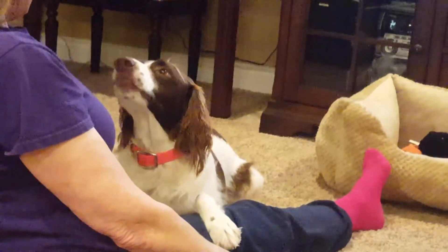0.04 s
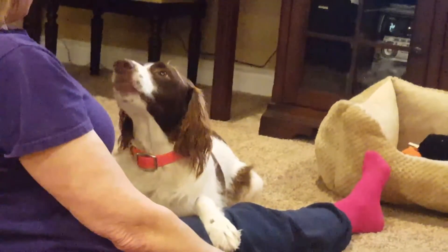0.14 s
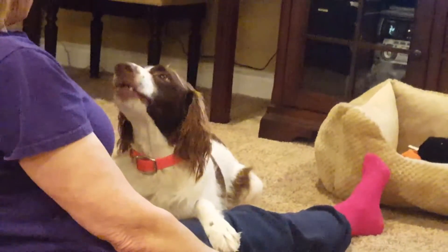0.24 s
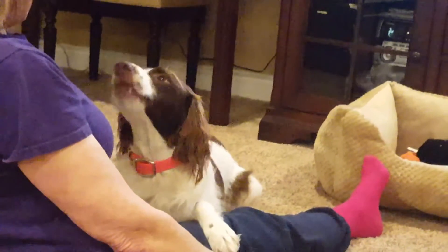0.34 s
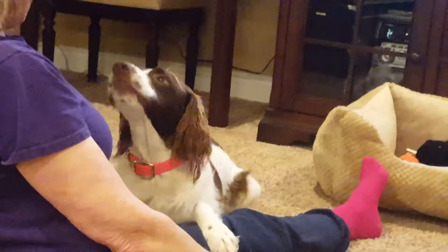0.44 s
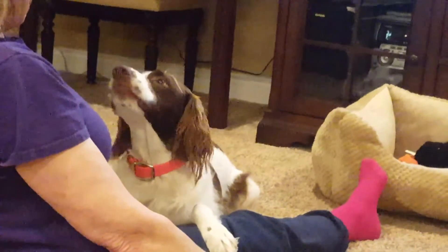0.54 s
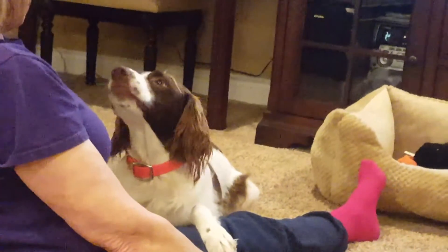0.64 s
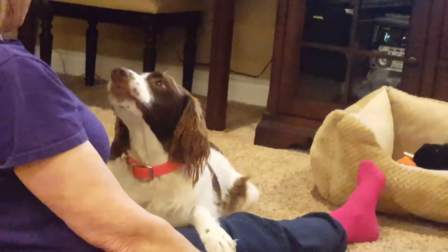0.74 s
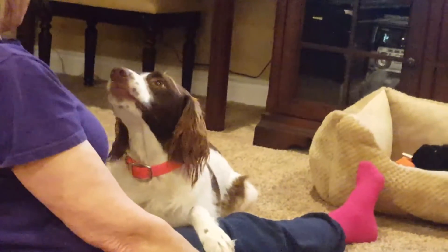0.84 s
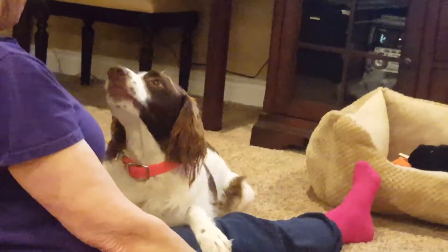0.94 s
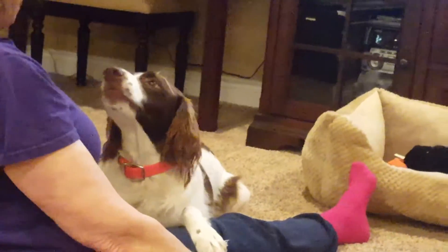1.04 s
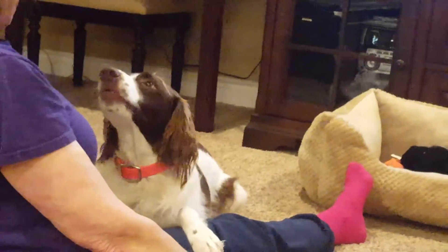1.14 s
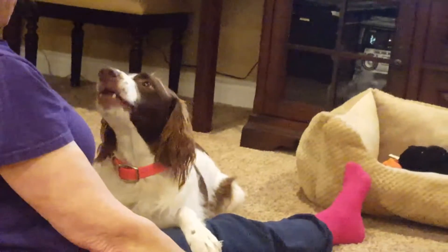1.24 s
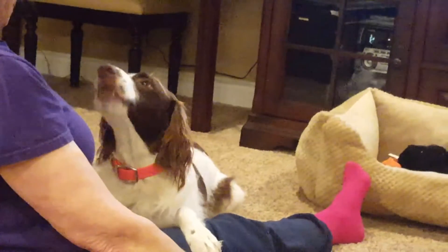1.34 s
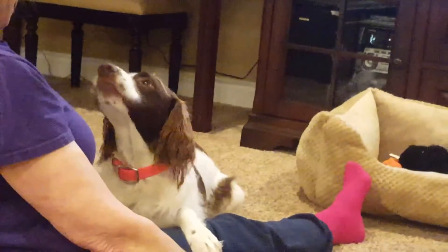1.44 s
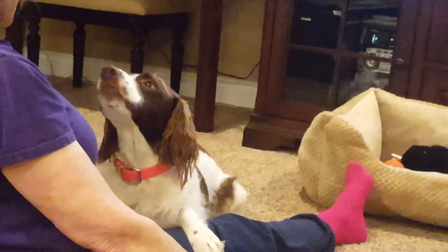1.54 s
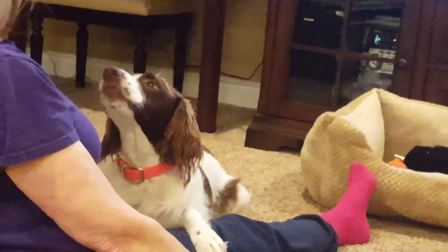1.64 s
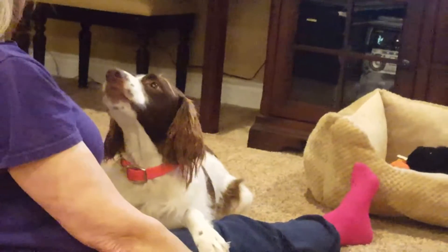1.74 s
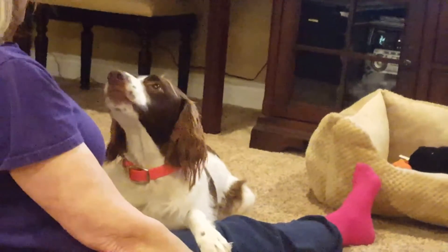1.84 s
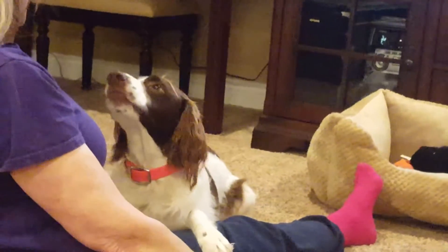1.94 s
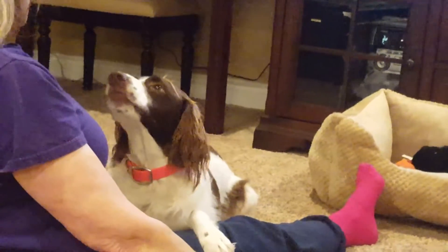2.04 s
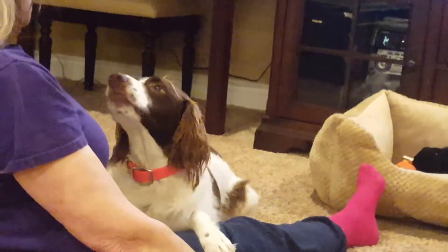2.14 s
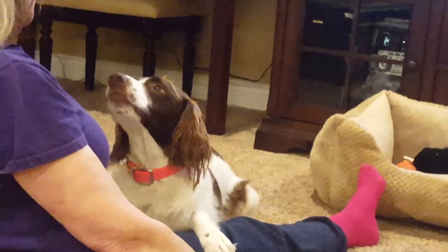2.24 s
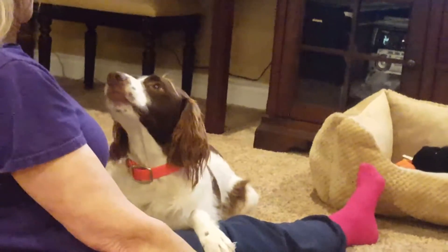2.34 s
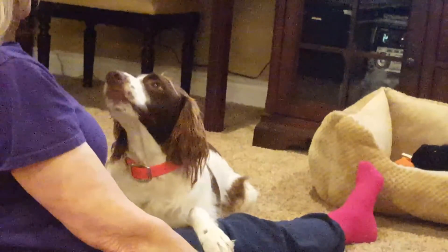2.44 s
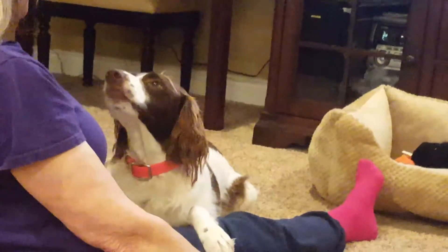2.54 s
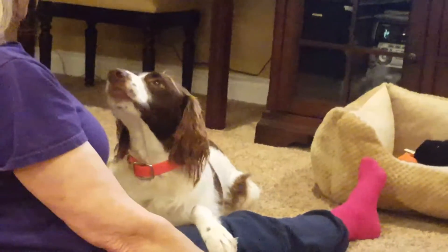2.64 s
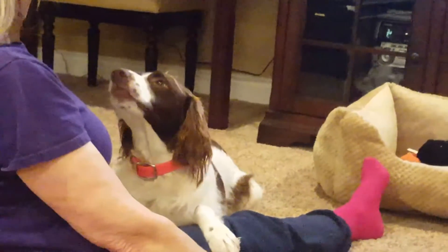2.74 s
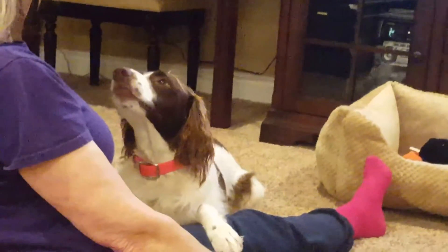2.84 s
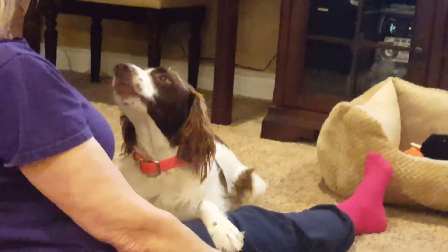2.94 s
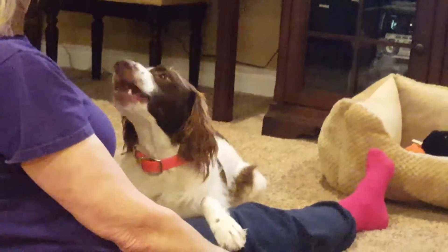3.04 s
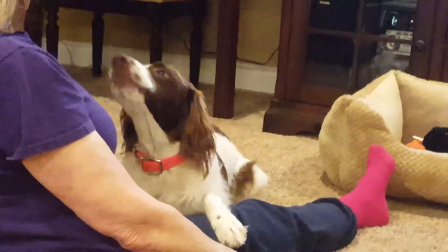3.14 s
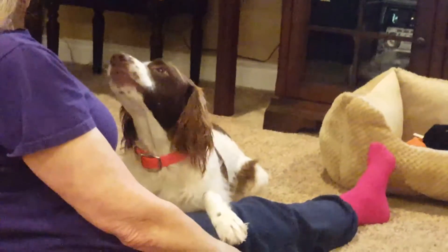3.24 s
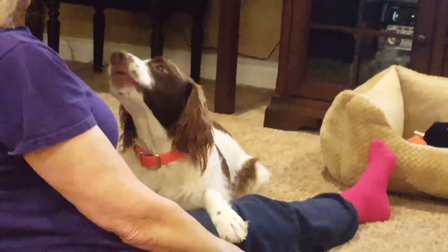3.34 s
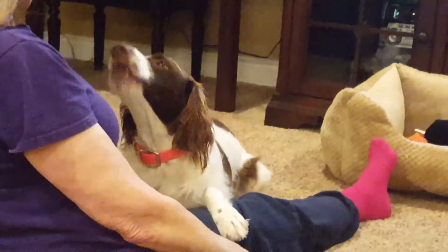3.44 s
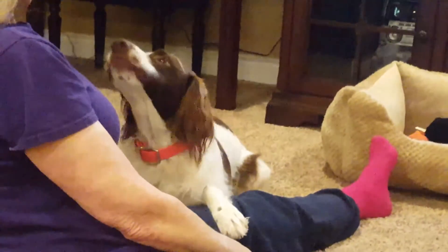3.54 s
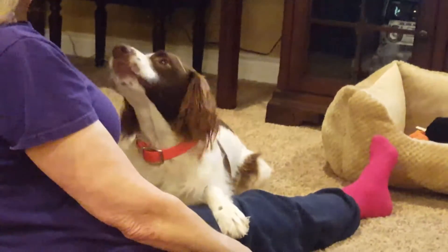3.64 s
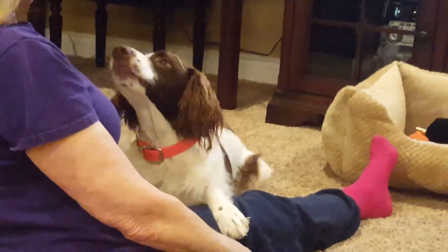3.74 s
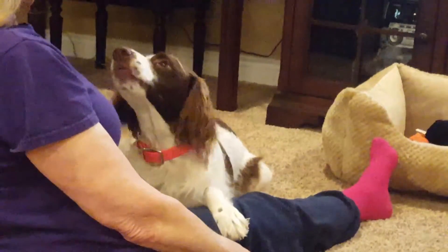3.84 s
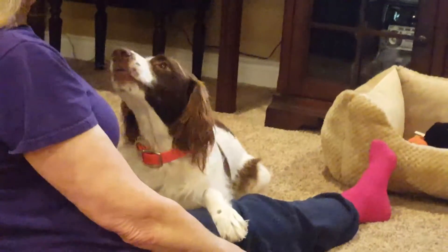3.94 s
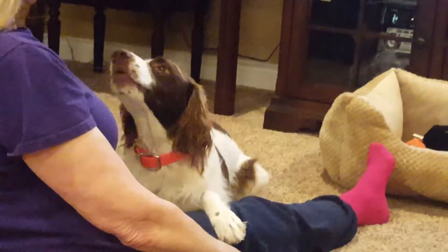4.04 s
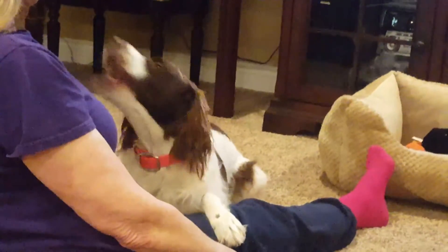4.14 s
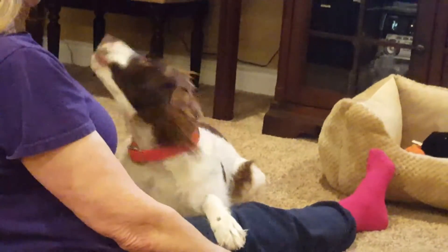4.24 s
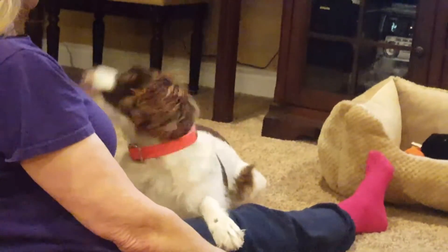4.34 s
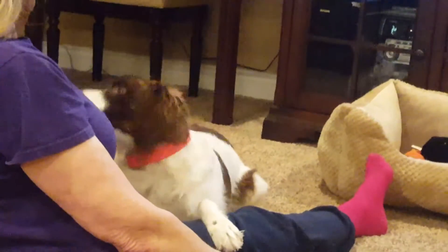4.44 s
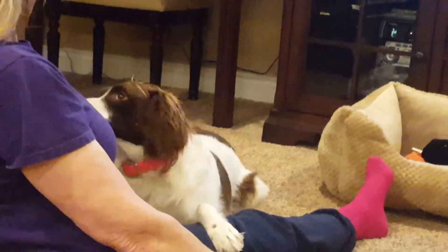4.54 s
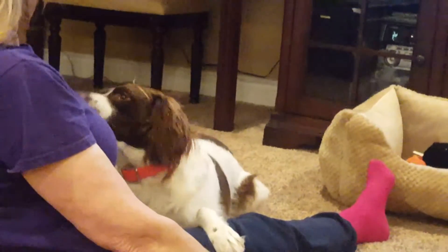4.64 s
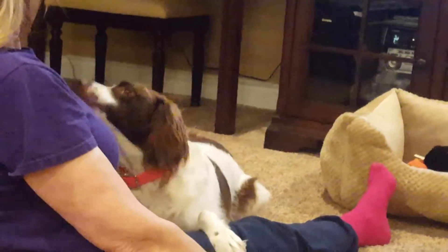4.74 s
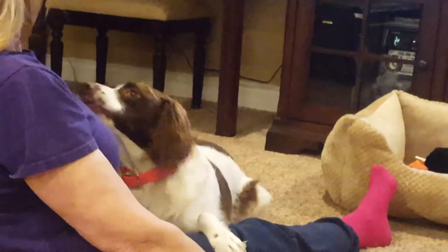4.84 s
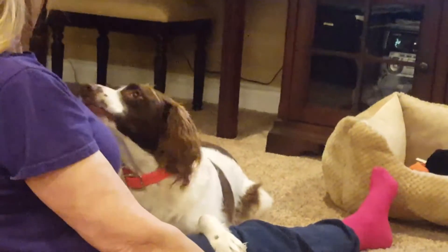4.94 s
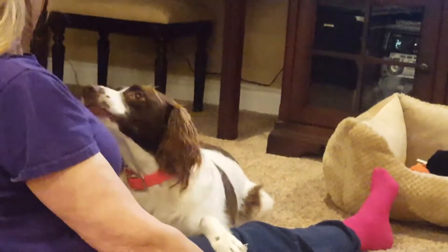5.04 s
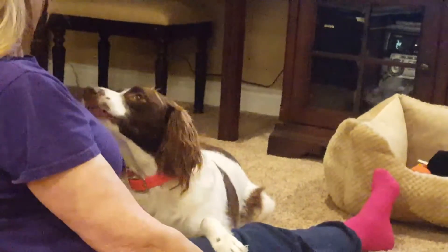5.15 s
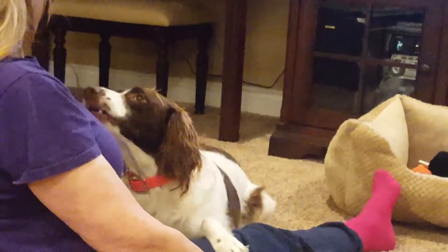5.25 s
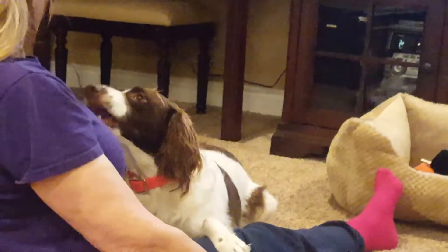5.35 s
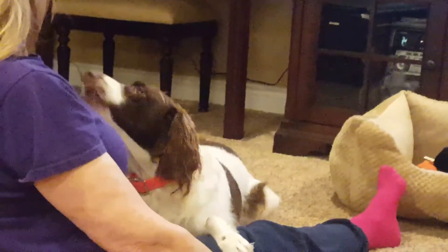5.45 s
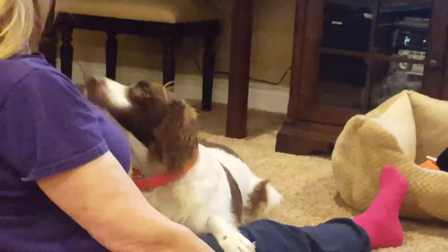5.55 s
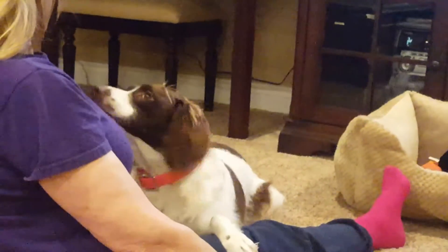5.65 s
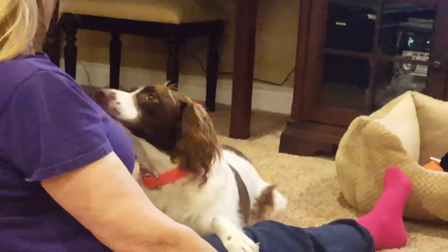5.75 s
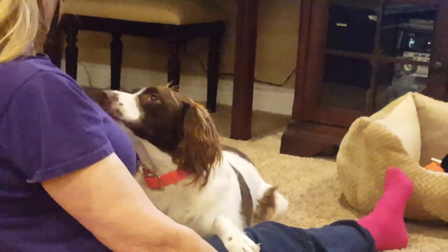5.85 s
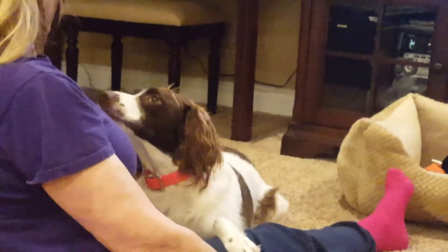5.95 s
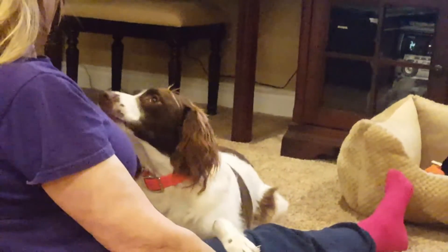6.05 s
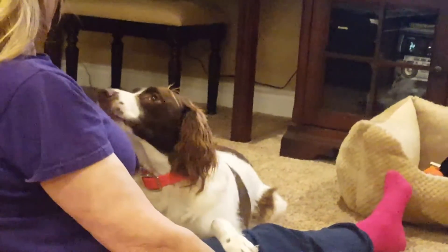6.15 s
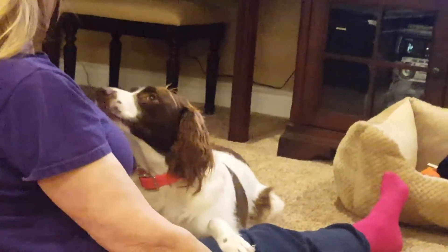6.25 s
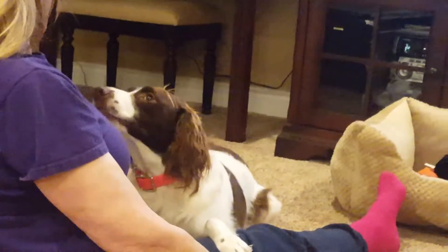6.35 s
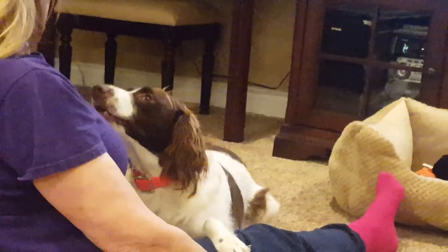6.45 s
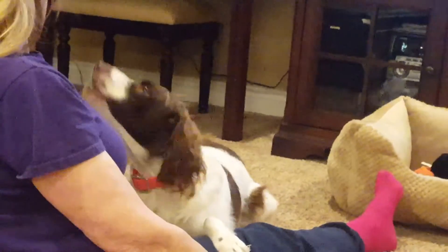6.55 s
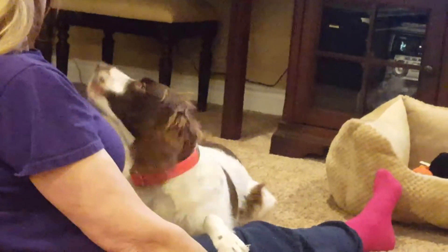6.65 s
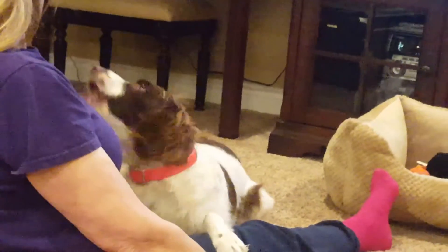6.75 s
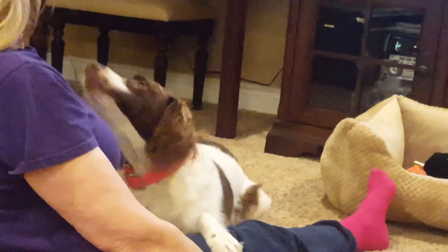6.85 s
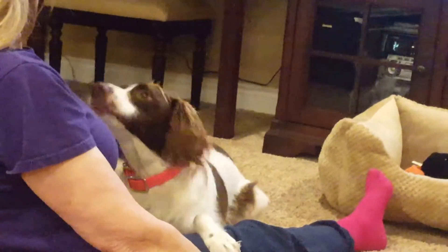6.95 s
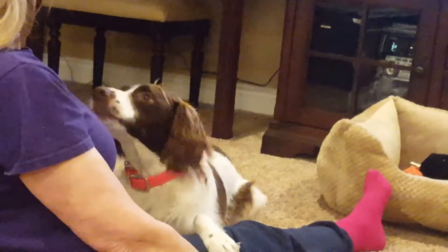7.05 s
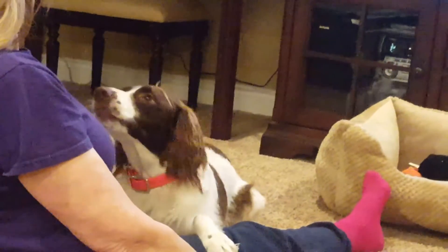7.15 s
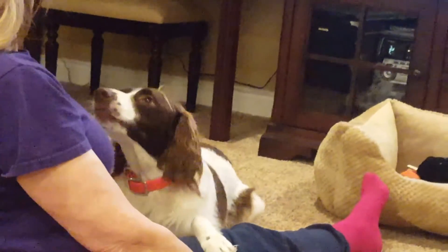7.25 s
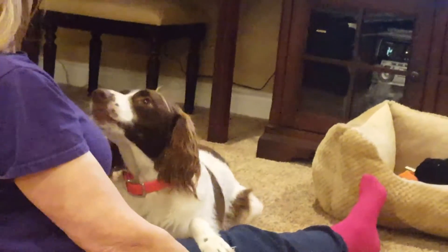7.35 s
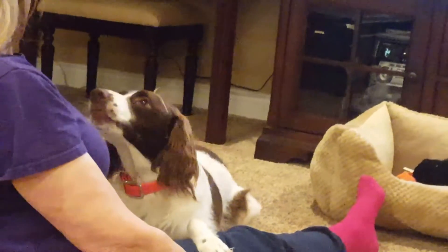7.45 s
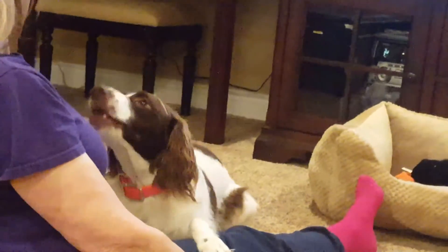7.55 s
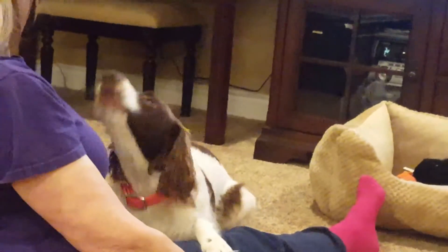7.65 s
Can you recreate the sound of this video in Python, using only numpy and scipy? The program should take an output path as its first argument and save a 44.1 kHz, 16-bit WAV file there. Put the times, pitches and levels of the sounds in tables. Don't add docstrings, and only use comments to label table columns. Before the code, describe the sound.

Close indoor phone pickup of one dog barking in a carpeted, furnished room. It starts with subdued, breathy huffs, spaced apart, with mouth clicks and faint nose or coat rubbing between. Then come short, piercing yelps that leap up in pitch and fall quickly into a small growl, irregularly spaced and closer together near the end. The room answers with a short diffuse ring; underneath is steady soft air and low appliance rumble.

```python
import sys
import numpy as np
from scipy import signal
from scipy.fft import rfft, irfft
from scipy.io import wavfile
from scipy.ndimage import uniform_filter1d, minimum_filter1d

SR = 44100
rng = np.random.default_rng(int(sys.argv[2]) if len(sys.argv) > 2 else 0)


def linear_from_db(decibels):
    return 10 ** (np.asarray(decibels, float) / 20)


def dump(signal):
    limited = np.clip(np.atleast_2d(signal).T, -1, 1)
    pcm = np.round(limited * 32767).astype(np.int16)
    wavfile.write(sys.argv[1], SR, pcm)


N = 339570

# (start [s], climb [s], hold [s], top pitch [Hz], level [dB])
BARK_CALLS = [
    (0.34, 0.034, 0.028, 204.8, -26.5),
    (1.327, 0.051, 0.018, 188, -22.5),
    (3.092, .06, .03, 298.5, -24),
    (3.419, 0.059, .036, 489.7, -10.5),
    (4.173, 0.049, .056, 559, -11),
    (4.696, .05, 0.019, 269.4, -38.5),
    (5.411, .049, .06, 599.8, -7.5),
    (6.508, 0.072, 0.039, 512, -14.5),
    (6.729, .055, .064, 606, -9.5),
    (7.607, 0.053, .03, 523.6, -11.5),
]
# (pitch as the hold ends [Hz], growl level [dB], last pitch [Hz])
BARK_GROWLS = [(234.5, -37, 105), (188, -39.5, 112), (318, -34.5, 91), (514.3, -30, 150), (481.2, -32, 98),
               (297.2, -40, 77), (571.7, -43.5, 170), (451.3, -29, 88), (478.5, -35.5, 120),
               (443.3, -17, 230)]
GROWL_LENGTHS = [.06, .09, .19, .09, .22, .08, .05, .1, .06, .05]
TOP_ROUGHNESS = [.3, .3, .2, .03, .06, .12, .14, .12, .26, .08]
# (whistling burst at the start [dB], narrow ring [dB], tongue resonance [Hz],
# first breath [dB], widest opening [about 0-1])
BARK_MOUTHS = [(-41.5, 13, 1360, -39, .75), (-43, 8, 1300, -39.5, 0.81), (-50, 10, 1430, -41, .75),
               (-61, 13.5, 1125, -53, 0.8), (-52, 4, 1277, -43, 0.9), (-60, -5, 1300, -45, 0.6),
               (-49, 5.5, 1272, -40, 1.1), (-48.5, 5, 1300, -40.5, 0.81), (-61.5, 4.5, 1080, -37, 1.0),
               (-52.5, 6.5, 1250, -47.5, 0.9)]


def dog_barks():
    barks = 0
    for call, growl, growl_s, top_rough, mouth in zip(
            BARK_CALLS, BARK_GROWLS, GROWL_LENGTHS, TOP_ROUGHNESS, BARK_MOUTHS):
        burst_db, ring_db, tongue_hz, onset_db, widest = mouth
        rows = gesture(call, growl, growl_s, top_rough, onset_db, widest)
        barks = barks + bark(rows, burst_db, ring_db, tongue_hz)
    no_rumble = signal.butter(2, 70, "high", fs=SR, output="sos")
    return signal.sosfilt(no_rumble, barks)


def gesture(call, growl, growl_s, top_rough, onset_db, widest):
    start, climb, hold, top_hz, top_db = call
    held_hz, growl_db, last_hz = growl
    onset_hz, onset_rough = 145.73, .65
    growl_rough, last_rough = .3, .9
    top_open, held_open = widest * .8, widest * .66
    growl_open = .14
    top = start + climb
    let_go = top + hold
    broken = let_go + .014
    broken_hz = min(217, 0.74 * held_hz)
    sunk_hz = broken_hz * (last_hz / broken_hz) ** .8
    halfway_hz = onset_hz + .38 * (top_hz - onset_hz)
    halfway_db = onset_db + .65 * (top_db - onset_db)
    sagging_hz = top_hz + .27 * (held_hz - top_hz)
    return [(start, onset_hz, onset_db, onset_rough, widest * .52),
            (start + .58 * climb, halfway_hz, halfway_db, onset_rough, widest),
            (top, top_hz, top_db, top_rough, top_open),
            (top + hold / 2, sagging_hz, top_db, top_rough, (top_open + held_open) / 2),
            (let_go, held_hz, top_db - 4, top_rough, held_open),
            (broken, broken_hz, growl_db, growl_rough, growl_open),
            (broken + .04, sunk_hz, growl_db - 5, growl_rough, growl_open),
            (broken + growl_s, last_hz, growl_db - 22, last_rough, growl_open)]


# (pitch [Hz], width [Hz], level [dB])
THROAT_RESONANCES = [(575, 265, 0), (1780, 786, -6.5), (2695, 247, -6), (3049, 300, -16.5)]
# (pitch [Hz], width [Hz], level [dB])
TEETH_RESONANCES = [(3300, 450, -7), (5250, 700, -0.5), (6700, 570, 0), (9000, 500, -28.5),
                    (12200, 3500, -23)]


def bark(rows, burst_db, ring_db, tongue_hz):
    s, *columns = np.transpose(rows)
    start = int(s[0] * SR)
    pad = 600
    t = np.arange(start - pad, int(s[-1] * SR) + pad) / SR
    since = np.maximum(t - s[0], 0)
    pitch_hz, level_db, rough, opening = [np.interp(t, s, c) for c in columns]
    rough = np.clip(rough, 0, 1)

    cycles = np.cumsum(pitch_hz * (1 + .18 * rough * wobble(len(t), 110))) / SR
    cycles -= cycles[pad + 30]
    harmonic = np.arange(1, 40)[:, None]
    harmonic_hz = harmonic * pitch_hz
    slope_db = -15.0 + 13.57 * opening
    weights = linear_from_db(slope_db * np.log2(harmonic_hz / 550)) * (harmonic_hz < 5000)
    pulses = np.sum(weights * np.sin(2 * np.pi * harmonic * cycles), axis=0)
    pulses *= linear_from_db(4.5 * rough * wobble(len(t), 190))
    pulses *= 1 + 0.45 * rough * np.cos(np.pi * cycles)

    gate = 1.2 + np.cos(np.pi * cycles) ** 4
    no_lows = signal.butter(2, 400, "high", fs=SR, output="sos")
    air = gate * signal.sosfilt(no_lows, rng.standard_normal(len(t)))
    breathy = .12 + 2.2 * rough
    source = pulses + breathy * opening * np.sqrt(np.sum(weights ** 2, axis=0)) * air

    tight = np.exp(-(since / .022) ** 2)
    ring = tight * resonance(source, 700, 55) + (1 - tight) * resonance(source, 570, 55)
    low_voice = np.clip((420 - pitch_hz) / 100, 0, 1)
    tongue = (tongue_hz, 260, -1.5)
    voice = tract(source, [THROAT_RESONANCES[0], tongue, *THROAT_RESONANCES[1:]])
    voice += linear_from_db(ring_db + 3.5) * low_voice * opening ** 2 * ring
    closed = np.clip(1.02 - opening, 0, 1) ** 2.1
    voice -= linear_from_db(2.5) * closed * (1 - 0.2 * tight) * resonance(pulses, 130, 260)
    voice /= np.sqrt(uniform_filter1d(voice ** 2, size=900) + 1e-12)
    voice = signal.lfilter(*signal.iirnotch(3750, 5.0, fs=SR), voice)

    hiss_db = -30
    hiss = tract(air, TEETH_RESONANCES)
    hiss *= linear_from_db(level_db + hiss_db + 6.7 * wobble(len(t), 66)) * opening / np.std(hiss)
    burst = tract(air, [(5230, 290, 0)])
    leads_voice = np.clip((t - s[0] + .008) / .004, 0, 1)
    burst *= linear_from_db(burst_db) * np.exp(-since / .03) * leads_voice / np.std(burst)

    rise = np.clip((t - s[0]) / .0015, 0, 1)
    fade = np.clip((s[-1] + .01 - t) / .01, 0, 1)
    out = np.zeros(N + SR)
    out[start - pad:start - pad + len(t)] = (voice * linear_from_db(level_db + 2.0) + hiss) * rise * fade + burst
    notch = signal.iirnotch(4250, 7.0, fs=SR)
    return signal.lfilter(*notch, signal.lfilter(*notch, out[:N] + 1e-18))


def tract(x, modes):
    out = 0
    for k, (hz, width_hz, db) in enumerate(modes):
        wide_hz = 1.55 * width_hz
        out = out + (-1) ** k * linear_from_db(db) * resonance(resonance(x, hz, wide_hz), hz, wide_hz)
    return out


def resonance(x, hz, width_hz):
    r = np.exp(-np.pi * width_hz / SR)
    feedback = [1, -2 * r * np.cos(2 * np.pi * hz / SR), r * r]
    return signal.lfilter(np.array([1, 0, -1]) * (1 - r * r) / 2, feedback, x)


def wobble(size, rate_hz):
    sos = signal.butter(2, rate_hz, fs=SR, output="sos")
    slow = signal.sosfilt(sos, rng.standard_normal(size + 4000))[4000:]
    return slow / np.std(slow)


# (time [s], peak level [dB], centre [Hz])
LIP_SMACKS = [(.299, -62, 2600), (1.302, -56, 2050), (2.703, -52, 4600), (2.716, -54, 3900),
              (2.756, -53, 6550), (2.842, -62, 3300), (2.858, -58, 5500), (3.055, -52, 2000),
              (4.154, -44, 2800), (4.658, -56, 3200), (7.468, -62, 2100)]


def smacks():
    out = np.zeros(N)
    t = np.arange(900) / SR
    crackle = rng.standard_normal((len(LIP_SMACKS), 900)) * np.exp(-t / .004)
    for (s, peak_db, hz), burst in zip(LIP_SMACKS, crackle):
        click = tract(burst, [(hz, 700, 0)])
        out[int(s * SR):][:900] += linear_from_db(peak_db + 7.5) * click / np.max(np.abs(click))
    return out


# (loudest time [s], swell [s], fade [s], level [dB], centre [Hz])
RUBS = [
    (1.93, 0.14, 0.15, -66.5, 4800),
    (2.386, 0.043, .06, -63, 2140),
    (4.389, .06, .5, -66.5, 5900),
    (4.78, 0.21, 0.094, -70.5, 5400),
    (5.049, 0.098, 0.11, -71, 5460),
    (6.489, .1, 0.027, -69.5, 4800),
    (7.6, .16, .03, -64, 4460),
]


def rustle():
    t = np.arange(N) / SR
    grain = rng.standard_normal(N) * linear_from_db(3.0 * wobble(N, 60))
    range_db = 21
    out = 0
    for s, swell_s, fade_s, level_db, hz in RUBS:
        away = np.maximum((s - t) / swell_s, (t - s) / fade_s)
        level = linear_from_db(level_db + 12 - range_db * np.minimum(away, 5))
        out = out + level * tract(grain, [(hz, hz / 3, 0)])
    return out


# (pitch [Hz], time [s])
ECHO_TIMES = [(100, 0.36), (250, 0.31), (550, 0.48), (1400, 0.58), (2800, 0.51), (5000, 0.47), (7000, .4),
              (12000, 0.52)]
# (pitch [Hz], likeness [-1 to 1])
ECHO_LIKENESS = [(150, 1), (300, 0.3), (550, 0.44), (1000, 0.046), (1600, -0.39), (3000, 0.49)]


def living_room(x):
    size = int(.9 * SR)
    t = np.arange(size) / SR
    hz, noise = stereo_noise(size, ECHO_LIKENESS)
    echoes = 0
    for centre in 60 * 2 ** np.arange(0, 8.6, .5):
        band = np.clip(1 - 2 * np.abs(np.log2(hz / centre)), 0, 1)
        echoes = echoes + irfft(noise * band, size) * linear_from_db(-60 * t / at_hz(ECHO_TIMES, centre))
    echoes *= np.clip((t - .003) / 0.0019, 0, 1)
    echoes /= np.sqrt(np.sum(echoes ** 2) / 2)
    return signal.fftconvolve(x[None], echoes, axes=1)[:, :N]


# (pitch [Hz], level [dB per Hz])
HUSH_COLOUR = [(25, -19.5), (38, -13), (51, 4.5), (70, -8.5), (240, -10), (500, -17.5), (1000, -20),
               (2000, -24.5), (4000, -29), (5400, -30), (5900, -32), (10000, -45), (12000, -34.5),
               (15500, -40)]
# (pitch [Hz], likeness [-1 to 1])
HUSH_LIKENESS = [(60, 0.73), (150, 0.76), (390, 0.32), (1010, -0.24), (2600, -0.22)]


def hush():
    hz, noise = stereo_noise(N, HUSH_LIKENESS)
    air = irfft(noise * linear_from_db(at_hz(HUSH_COLOUR, hz)), N)
    return linear_from_db(-61) * air / np.std(air.mean(axis=0))


def stereo_noise(size, alike):
    hz = np.maximum(np.arange(size // 2 + 1) * SR / size, 1)
    mid, side = rfft(rng.standard_normal((2, size)))
    likeness = np.clip(at_hz(alike, hz), -1, 1)
    shared = np.sqrt(1 + likeness) * mid
    opposite = np.sqrt(1 - likeness) * side * [[1], [-1]]
    return hz, (shared + opposite) / np.sqrt(2)


def at_hz(points, hz):
    table_hz, values = np.array(points).T
    return np.interp(np.log(hz), np.log(table_hz), values)


def scene():
    voice, clicks, brushing = dog_barks(), smacks(), rustle()
    dog = voice + clicks + brushing
    left_lead_s = .0001
    late = np.interp(np.arange(N) - left_lead_s * SR, np.arange(N), dog)
    walls = living_room(voice + brushing + .3 * clicks)
    room_db, left_db = 0.5, 1.5
    walls = walls * linear_from_db([[room_db + left_db / 2], [room_db - left_db / 2]])
    return np.array([dog, late]) + walls + hush()


def roll_off(x):
    return signal.sosfilt(signal.butter(12, 15750, fs=SR, output="sos"), x)


def record(dry):
    t = np.arange(N) / SR
    power = uniform_filter1d(np.mean(dry ** 2, axis=0), size=2000)
    over_db = np.maximum(10 * np.log10(power + 1e-12) + 26.8, 0)
    creep_db = 2.0 * t
    sag_db = np.maximum.accumulate(0.13 * over_db + creep_db) - creep_db
    sag_db = signal.lfilter([.0005], [1, -1 + .0005], sag_db)
    held = dry * linear_from_db(-sag_db)
    ceiling = .94
    headroom = np.minimum(ceiling / (np.max(np.abs(held), axis=0) + 1e-9), 1)
    held = held * uniform_filter1d(minimum_filter1d(headroom, size=441), size=441)
    return roll_off(held)


dry = scene()
out = record(dry)
dump(out)
```